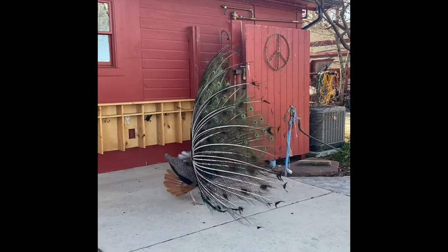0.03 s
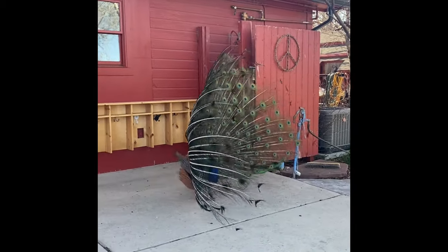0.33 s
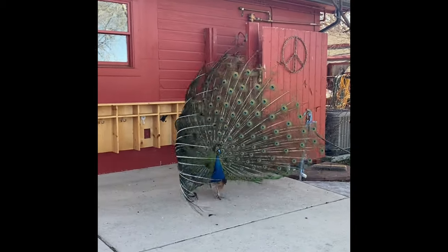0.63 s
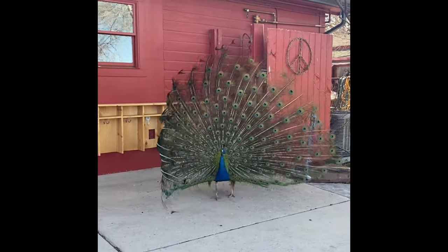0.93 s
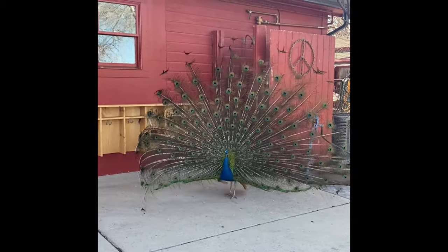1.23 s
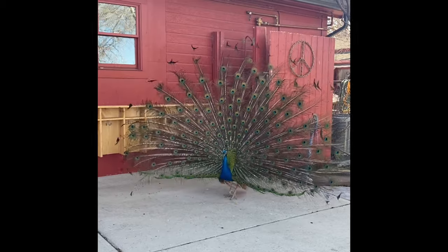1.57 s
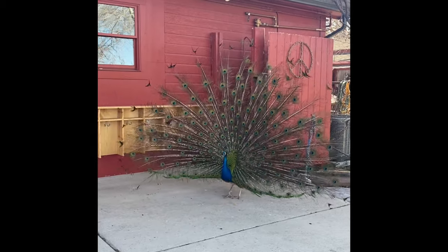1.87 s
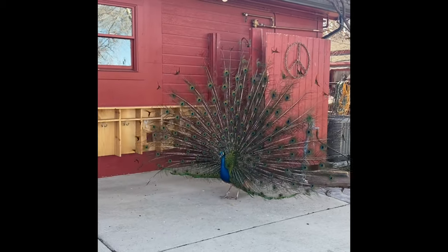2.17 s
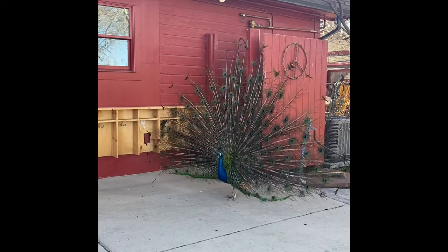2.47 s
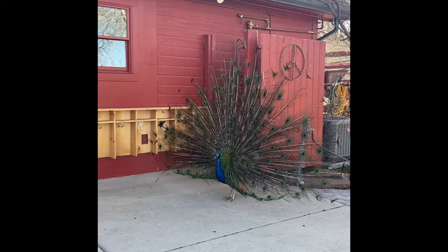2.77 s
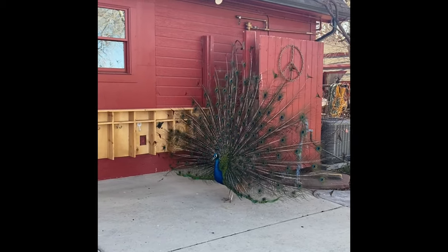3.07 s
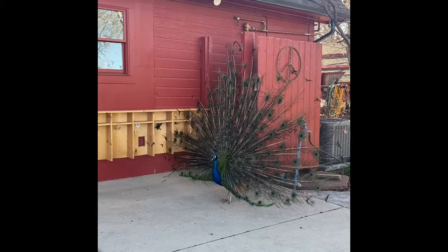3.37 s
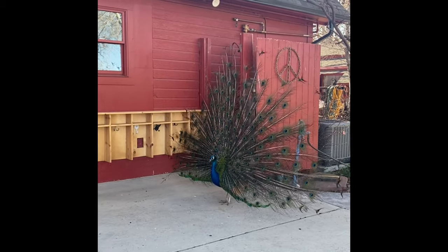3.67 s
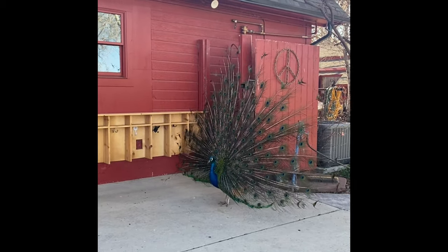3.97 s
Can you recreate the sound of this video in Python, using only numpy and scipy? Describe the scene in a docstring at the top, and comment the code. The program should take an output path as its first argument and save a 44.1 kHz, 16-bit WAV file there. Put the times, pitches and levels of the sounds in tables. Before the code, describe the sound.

Tail feathers rustling in swishes as a peacock turns, with birds whistling over a low rumble.

```python
"""A peacock turns close to the microphone on a concrete yard, its train fanned: barbs slide over each
other in swishing strokes, quills tick together, feet scuff and the wings flutter softly.
Small birds chirp farther off and one whistles nearby, their gliding tones echoing between the walls.
A machine hums over a distant rumble, and near the end a puff of wind hits the microphone."""
import sys
import numpy as np
from scipy import signal
from scipy.fft import rfft, irfft
from scipy.io import wavfile
from scipy.ndimage import uniform_filter1d

SR = 44100
rng = np.random.default_rng(int(sys.argv[2]) if len(sys.argv) > 2 else 0)


def transcribe(u):
    """Save the signal u as a 16-bit wav file named by the first command-line argument.

    u: samples, shape (n,) or (channels, n), limited to [-1, 1]; the rate is SR.
    q: integer samples, one column per channel.
    """
    v = np.clip(np.atleast_2d(u).T, -1, 1)
    q = np.round(v * 32767).astype(np.int16)
    wavfile.write(sys.argv[1], SR, q)


N = 176400
T, BIN_HZ = np.arange(N) / SR, np.arange(N // 2 + 1) * SR / N
PEACOCK_LAG_MS = .19  # the peacock reaches the right channel this much later


def from_db(db):
    """Decibels to gain."""
    return 10 ** (np.asarray(db) / 20)


def unit_rms(x):
    """Scale to unit power."""
    return x / np.sqrt(np.mean(x ** 2) + 1e-20)


def per_bin(points):
    """Read a table on a log-frequency axis, at every bin."""
    hz, value = np.transpose(points)
    return np.interp(np.log(BIN_HZ + 1), np.log(hz), value)


def drift(per_s):
    """Smooth random wander with spread 1."""
    size = max(2, int(SR / per_s / 2))
    smoothed = uniform_filter1d(rng.standard_normal(N), size, mode="wrap")
    return unit_rms(uniform_filter1d(smoothed, size, mode="wrap"))


def coloured(pair, colour, likeness, lag_ms=0):
    """Two unrelated signals become one stereo sound of unit power; likeness 1 is mono."""
    mid, side = rfft(pair) * from_db(per_bin(colour))
    mid, side = mid * np.sqrt(1 + likeness), side * np.sqrt(1 - likeness)
    treble_rolloff = 1 / (1 + (BIN_HZ / colour[-1][0] / 2) ** 6)
    bass_rolloff = BIN_HZ ** 2 / (BIN_HZ ** 2 + (colour[0][0] / 2) ** 2)
    lag = np.exp(-2j * np.pi * BIN_HZ * lag_ms / 1000)
    channels = np.array([mid + side, (mid - side) * lag])
    return unit_rms(irfft(channels * treble_rolloff * bass_rolloff, N))


def swells(rows):
    """Envelope of rounded swells, each (peak_s, level_db, half_length_s)."""
    return np.sqrt(sum(from_db(db) ** 2 / (1 + ((T - s) / half) ** 2 / 2) ** 3 for s, db, half in rows))


def evened(x, span_s):
    """Hold a noise at a steady level, so that only its envelope shapes it."""
    return x / np.sqrt(uniform_filter1d(np.mean(x ** 2, axis=0), int(span_s * SR)) + 1e-6)


def friction(colour, contacts_per_s=6000, spread_db=2.5):
    """Rubbing close to the microphone: countless tiny contacts of uneven size."""
    sizes = from_db(spread_db * np.minimum(rng.exponential(1, (2, N)), 5))
    signs = rng.choice([-1, 1], (2, N))
    touching = rng.random((2, N)) < contacts_per_s / SR
    return coloured(sizes * signs * touching, colour, likeness=.8, lag_ms=PEACOCK_LAG_MS)


# How alike the microphone's two channels are, from 0 to 1: frequency_hz, likeness
CHANNEL_LIKENESS = [(60, 0.99), (130, 0.99), (270, 0.96), (450, 0.59), (1200, 0.34), (3300, 0.35)]
def noise(colour):
    """Smooth noise, nearly mono in the bass and wider in the treble."""
    return coloured(rng.standard_normal((2, N)), colour, per_bin(CHANNEL_LIKENESS))


# Rustle of the train, fading as the bird turns: time_s, level_db
TRAIN_RUSTLE = [(0, -57), (.5, -59.5), (.88, -63.5), (1.3, -65), (2, -66.5), (2.8, -73), (4, -70)]
# Swings of the fan: peak_s, level_db, half_length_s
TRAIN_SWISHES = [(.01, -60.5, 0.016), (.23, -56, 0.016), (.628, -49.5, 0.0096), (.675, -57, 0.014),
                 (.77, -56.5, 0.024), (.93, -49.5, 0.01), (.985, -59, 0.015), (1.065, -57, .008),
                 (1.14, -66, .025), (1.235, -62, 0.015), (1.422, -53.5, 0.0092), (1.595, -60.5, 0.02),
                 (1.765, -66, 0.015), (1.95, -60.5, 0.015), (2.148, -66, 0.028), (2.562, -67, 0.043),
                 (2.755, -68, 0.028), (2.96, -69.5, 0.03), (3.165, -64.5, 0.018), (3.37, -61.5, 0.016),
                 (3.56, -64.5, 0.015), (3.765, -63.5, 0.01)]
# Spectra of the rustle and the swishes: frequency_hz, gain_db
RUSTLE_SPECTRUM = [(1000, -9), (2200, 4.5), (4500, 5.5), (6200, -1), (11000, 0.5), (15500, -5.5)]
SWISH_SPECTRUM = [(1000, -3.5), (3000, -3.5), (6200, -1.5), (10000, 2.5), (15500, -8.5)]
def train_feathers(flicker_db=2):
    """Close by, barbs slide over each other all the time, and harder with each swing of the fan."""
    rustle_db = np.interp(T, *np.transpose(TRAIN_RUSTLE)) + flicker_db * drift(per_s=41)
    rustle = from_db(rustle_db) * friction(RUSTLE_SPECTRUM)
    return rustle + swells(TRAIN_SWISHES) * friction(SWISH_SPECTRUM)


# Spectra of the rumble and the air: frequency_hz, gain_db
RUMBLE_SPECTRUM = [(20, -16), (52, -1), (110, -3), (170, -10), (300, -16), (480, -17), (950, -17),
                   (1800, -33)]
AIR_SPECTRUM = [(1500, -23), (3000, 10), (6000, 18), (16000, -75)]
def distant_rumble():
    """A steady rumble from far off, under a faint hiss of air."""
    return from_db(-51) * noise(RUMBLE_SPECTRUM) + from_db(-79.5) * noise(AIR_SPECTRUM)


# Tones of the machine: pitch_hz, level_db, wander_fraction
HUM_TONES = [(78.7, -47, 0.014), (228, -68.5, 0.02008), (462.3, -69.5, 0.0045)]
def machine_hum(wobble_db=1.5):
    """A machine hums in the background, dead centre, each tone wavering in level and pitch."""
    out = np.zeros(N)
    for hz, db, wander in HUM_TONES:
        gain = from_db(db + wobble_db * drift(per_s=7))
        pitch_hz = hz * (1 + wander * drift(per_s=10.33))
        out += gain * np.sqrt(2) * np.sin(2 * np.pi * np.cumsum(pitch_hz) / SR)
    return out


# Contour of each named bird note: age_s, pitch_hz, gain_db
NOTE_SHAPES = { "chirrup": [(0, 3784, -1), (.012, 4440, 1.5), (.022, 4480, 2), (.033, 3610, 5.5),
               (.048, 4400, -9.5), (.064, 3130, 1), (.073, 3500, 4.5), (.081, 2930, 3), (.089, 3140, -6)],
               "cheep": [(0, 4085, -10), (.02, 4185, 2), (.052, 3710, 6), (.056, 2640, 0.5),
               (.067, 3025, 2), (.082, 2620, -2)], "pip": [(0, 5600, -9), (.015, 5560, -4),
               (.034, 5510, -7), (.06, 5470, -16)], "high cheep": [(0, 4600, -3.5), (.03, 4750, 5.5),
               (.055, 4750, -8)], "slur": [(0, 4206, -7.5), (.018, 3864, 3.5), (.043, 3350, -6.5)],
               "arch": [(0, 3310, -11), (.018, 3682, -1.5), (.045, 3400, -11.5), (.072, 3054, -10.5)],
               "whistle": [(0, 2350, -14), (.008, 3060, -1), (.022, 3460, -3), (.034, 3034, 2),
               (.044, 2450, -2.5), (.065, 2116, -10), (.095, 2026, -10.5), (.135, 2020, -19.5)],
               "long whistle": [(0, 3844, -11), (.014, 3370, 3.5), (.034, 4190, -13.5), (.045, 3550, -6),
               (.056, 3135, 4), (.078, 2880, 6.5), (.11, 2683, -6), (.16, 2350, -12), (.195, 2607, 0),
               (.215, 2463, -2.5), (.235, 2410, -12)], "peaked whistle": [(0, 2573, -20), (.02, 2860, 1),
               (.038, 3420, -7), (.053, 2504, -7.5), (.078, 2275, -8.5), (.085, 2646, -8.5),
               (.128, 2587, -12.5)], "flat whistle": [(0, 2910, 2), (.012, 2946, 8), (.055, 2850, -3)],
               "rising whistle": [(0, 2420, -30), (.022, 2690, -8.5), (.045, 2750, -2), (.07, 2706, -9)]}
def bird_notes(calls, lead_ms, edge_s=.00062, pan_db=1.23):
    """Gliding tones that warble or rasp, lead_ms earlier on the left and a little louder on the right."""
    out = np.zeros((2, N + SR))
    warble, rasp = .017 * drift(per_s=155), .04 * drift(per_s=530)
    rasp_gain = unit_rms(from_db(4 * drift(per_s=600)))
    for start_s, note, db, pitch_ratio in calls:
        raspy = note in ("chirrup", "cheep", "high cheep")
        age_s, hz, gain_db = np.transpose(NOTE_SHAPES[note])
        age = T[:int(age_s[-1] * SR)]
        span = int(start_s * SR) + np.arange(len(age))
        glide_hz = pitch_ratio * uniform_filter1d(np.interp(age, age_s, hz), size=220)
        pitch_hz = glide_hz * (1 + (rasp if raspy else warble)[span % N])
        fade = np.clip(np.minimum(age, age[-1] - age) / edge_s, 0, 1)
        gain = from_db(db + np.interp(age, age_s, gain_db)) * fade
        if raspy:
            gain *= rasp_gain[span % N]
        cycles = np.cumsum(pitch_hz) / SR - np.outer([0, lead_ms / 1000], pitch_hz)
        out[:, span] += np.sqrt(2) * gain * np.sin(2 * np.pi * cycles)
    return out[:, :N] * from_db([[-pan_db], [pan_db]])


# Reflections from the walls: delay_s, gain_db
WALL_ECHOES = [(.0115, -12), (.038, -14)]
def yard(direct, wet_db, t60_s):
    """Sound reaches the microphone directly, off two walls and as a diffuse tail."""
    age = T[:SR]
    build_up = 1 - np.exp(-age / .01)
    tail = rng.standard_normal((2, SR)) * from_db(-60 * age / t60_s) * build_up
    diffuse = signal.fftconvolve(direct, unit_rms(tail) / np.sqrt(SR), axes=1)[:, :N]
    walls = sum(from_db(db) * np.array([np.interp(T - s, T, channel, left=0) for channel in direct])
                for s, db in WALL_ECHOES)
    return direct + walls + from_db(wet_db) * diffuse


# Calls around the yard: start_s, note, level_db, pitch_ratio
BIRD_CALLS = [(0.034, "cheep", -57, 0.98), (.02, "high cheep", -61.5, 1.06), (.297, "chirrup", -56.5, 0.99),
              (1.043, "slur", -63.5, 0.98), (1.158, "slur", -61.5, 0.97), (1.266, "slur", -61, 1.01),
              (1.345, "arch", -48.5, 0.99), (1.335, "arch", -54.5, 1.12), (2.256, "arch", -62, 0.87),
              (2.373, "slur", -63, 0.95), (1.554, "chirrup", -57.5, 0.99), (1.62, "slur", -60.5, 1.5),
              (1.845, "chirrup", -57.5, 0.97), (2.003, "slur", -67.5, 1.5), (2.405, "whistle", -44, 0.98),
              (2.656, "cheep", -59, 1.004), (2.662, "high cheep", -62.5, 1),
              (2.856, "long whistle", -41.5, 1), (3.27, "chirrup", -59, 1.02),
              (3.418, "rising whistle", -40, 0.99), (3.462, "slur", -54, 0.9),
              (3.52, "peaked whistle", -33.5, 1.008), (3.665, "high cheep", -67, 0.82),
              (3.922, "arch", -58, 0.97), (3.923, "slur", -54.5, 0.68),
              (3.955, "flat whistle", -40.5, 0.98)]
# One high-voiced bird repeating a pip: start_s, level_db
HIGH_PIPS = [(1.002, -60), (1.112, -61), (1.222, -58), (1.337, -63), (1.451, -64)]
def small_birds():
    """Chirpers far enough off to be reverberant; a piping bird and a whistler nearer and drier."""
    chirps = bird_notes([call for call in BIRD_CALLS if "whistle" not in call[1]], lead_ms=.052)
    pips = bird_notes([(s, "pip", db, 1) for s, db in HIGH_PIPS], lead_ms=0)
    whistles = bird_notes([call for call in BIRD_CALLS if "whistle" in call[1]], lead_ms=.12)
    return yard(chirps, wet_db=-2.5, t60_s=.49) + yard(pips + whistles, wet_db=-11.5, t60_s=.69)


# The peacock's steps: peak_s, level_db
FOOT_SCUFFS = [(0.057, -55), (.67, -62.5), (.78, -61), (.99, -60.5), (2.234, -59.5)]
# Spectrum of a scuff: frequency_hz, gain_db
SCUFF_SPECTRUM = [(500, -16), (1000, -1.5), (1900, 6), (3000, -3), (6000, -96)]
def feet(half_length_s=.029):
    """Feet scuff the concrete in short, gritty strokes."""
    return swells([(s, db, half_length_s) for s, db in FOOT_SCUFFS]) * friction(SCUFF_SPECTRUM)


# Quill strikes, before the spectrum shapes them: start_s, energy_db
QUILL_TICKS = [(.0805, -16), (.2805, -18), (.5103, -11), (.7035, -16), (1.204, -29), (1.685, -25),
               (1.702, -27)]
# Spectrum of a tick: frequency_hz, gain_db
TICK_SPECTRUM = [(2000, -20), (5000, -13), (7500, -7), (11000, 0), (15500, -9)]
def quills(decay_s=.00025):
    """Quills knock together in very short, bright ticks that reach the left channel first."""
    snaps, age = np.zeros(N), T[:SR // 100]
    for start_s, db in QUILL_TICKS:
        start = int(start_s * SR)
        snap = rng.standard_normal(len(age)) * np.exp(-age / decay_s)
        snaps[start:start + len(age)] += from_db(db) * snap / np.linalg.norm(snap)
    ticks = irfft(rfft(snaps) * from_db(per_bin(TICK_SPECTRUM)), N)
    return np.array([ticks, np.roll(ticks, int(PEACOCK_LAG_MS * SR / 1000))])


# Flutters of the wings: peak_s, level_db
WING_FLUTTERS = [(0.191, -48), (0.368, -49.5), (0.671, -51), (.81, -49), (1.25, -53), (1.432, -51.5),
                 (1.571, -52), (1.93, -50), (2.02, -49), (2.16, -52.5), (2.288, -46.5), (2.712, -52),
                 (2.927, -51.5), (3.052, -53.5), (3.321, -54)]
# Spectrum of a flutter: frequency_hz, gain_db
WING_SPECTRUM = [(120, -48), (200, -.5), (280, 5.5), (430, -6), (650, -6), (1400, -25), (3000, -54)]
def wings(half_length_s=.019):
    """Wings flutter behind the fan in soft, low puffs."""
    envelope = swells([(s, db, half_length_s) for s, db in WING_FLUTTERS])
    return envelope * evened(noise(WING_SPECTRUM), span_s=.072)


# Buffets, and finer eddies at the front of the puff: peak_s, level_db, half_length_s
WIND_BUFFETS = [(2.7, -39.5, 0.064), (3.22, -41.5, 0.036), (3.495, -27, 0.016), (3.548, -20.5, 0.01),
                (3.638, -23, 0.018), (3.58, -33.5, 0.065), (3.84, -44, 0.036)]
WIND_EDDIES = [(3.495, -30, 0.04), (3.55, -23.5, 0.0069), (3.63, -42, 0.085)]
# Their spectra: frequency_hz, gain_db
BUFFET_SPECTRUM = [(24, -15), (42, 4), (60, 6.5), (90, -8), (140, -21), (250, -43), (600, -48.5)]
EDDY_SPECTRUM = [(50, -4.5), (110, 7.5), (160, -3), (250, -11.5), (400, -46), (900, -45)]
def wind_on_microphone():
    """Wind strikes the microphone itself, making lumps of deep pressure noise."""
    buffets = swells(WIND_BUFFETS) * evened(noise(BUFFET_SPECTRUM), span_s=.031)
    eddies = swells(WIND_EDDIES) * evened(noise(EDDY_SPECTRUM), span_s=.027)
    return buffets + eddies


def scene():
    """The yard from one spot: the peacock close and dry, birds and background beyond it, and wind."""
    return (train_feathers() + distant_rumble() + machine_hum() + small_birds()
            + feet() + quills() + wings() + wind_on_microphone())


def record(dry, low_cut_hz=38, high_cut_hz=15900):
    """The microphone loses the deepest bass, and the top is cut steeply."""
    low_cut = signal.butter(4, low_cut_hz, "high", fs=SR, output="sos")
    high_cut = signal.ellip(10, .1, 80, high_cut_hz, fs=SR, output="sos")
    return signal.sosfilt(high_cut, signal.sosfilt(low_cut, dry))


dry = scene()
out = record(dry)
transcribe(out)
```